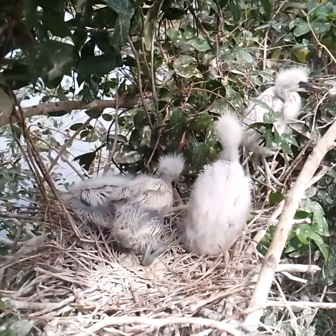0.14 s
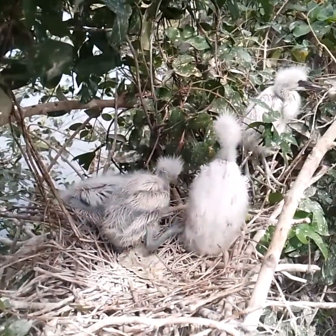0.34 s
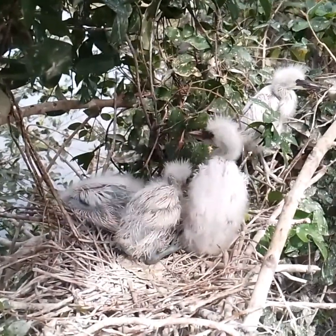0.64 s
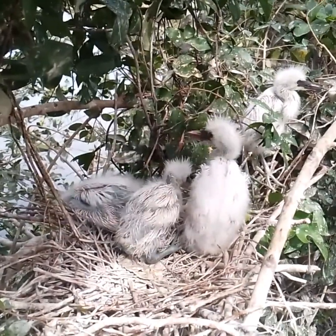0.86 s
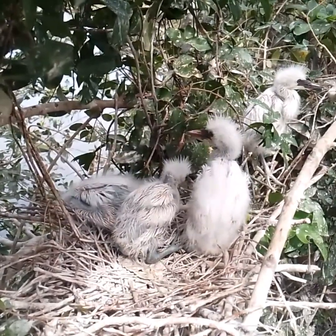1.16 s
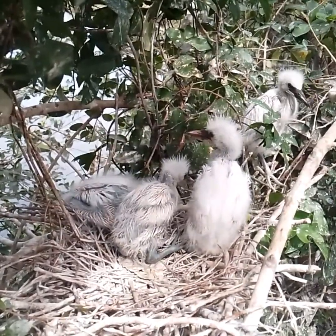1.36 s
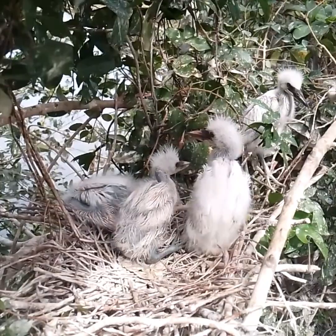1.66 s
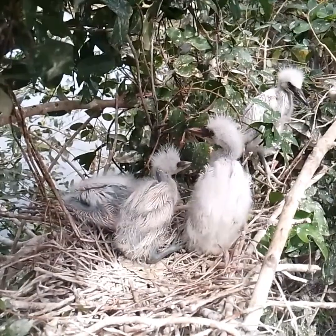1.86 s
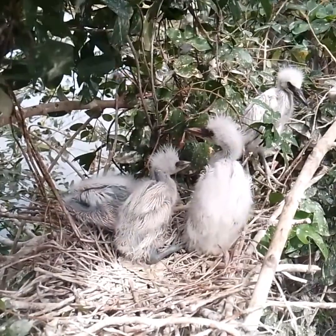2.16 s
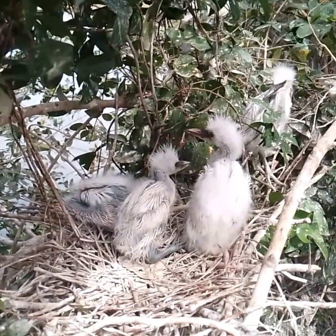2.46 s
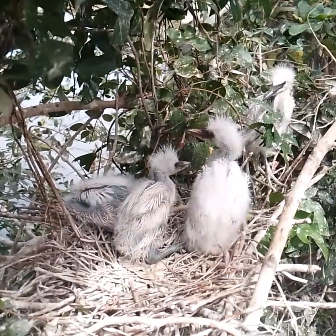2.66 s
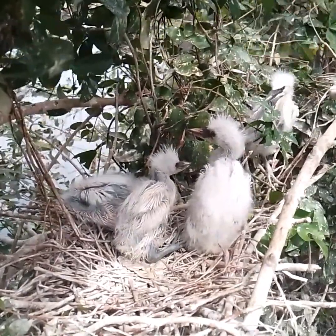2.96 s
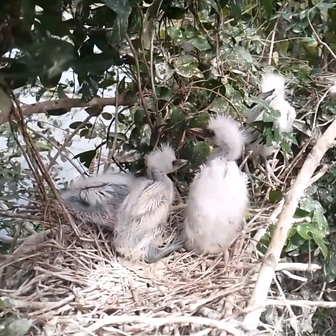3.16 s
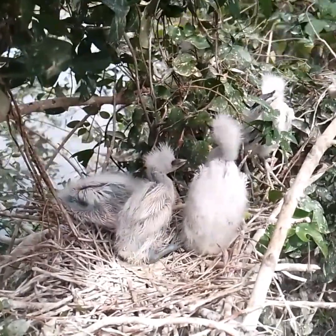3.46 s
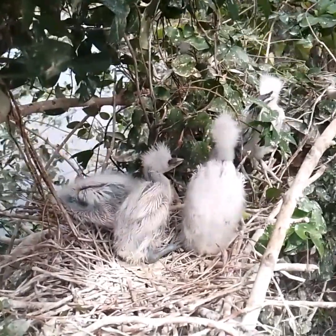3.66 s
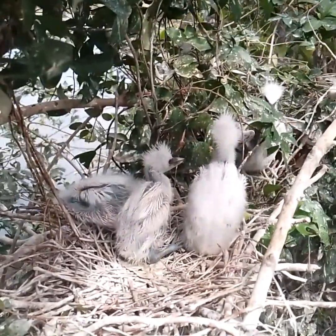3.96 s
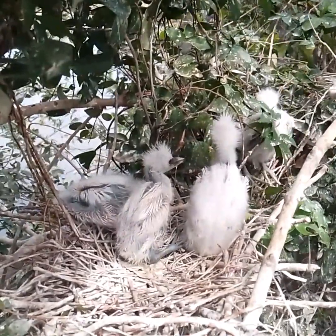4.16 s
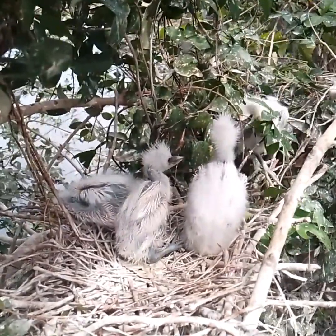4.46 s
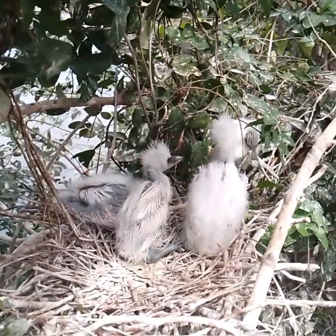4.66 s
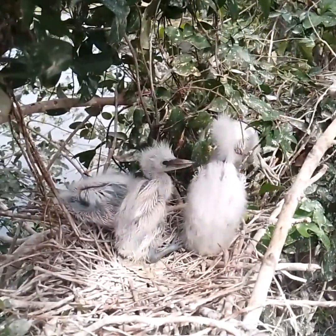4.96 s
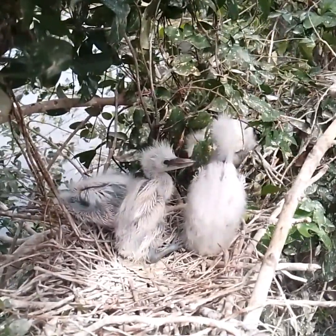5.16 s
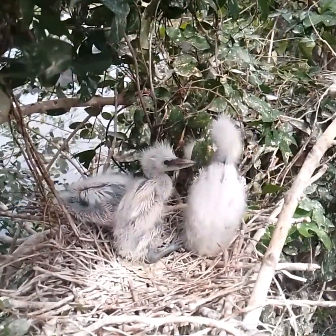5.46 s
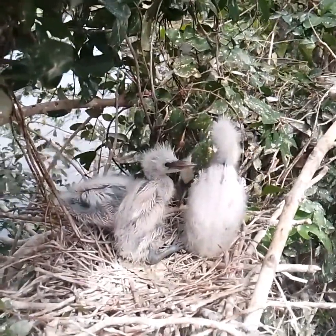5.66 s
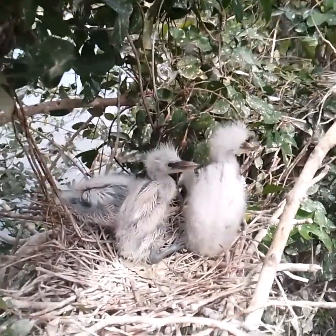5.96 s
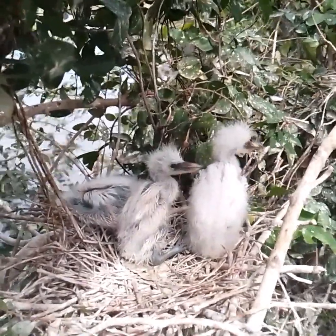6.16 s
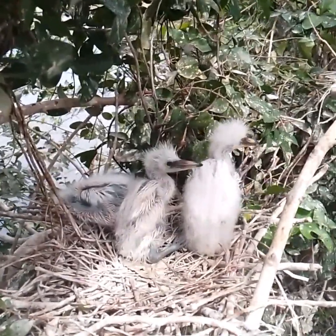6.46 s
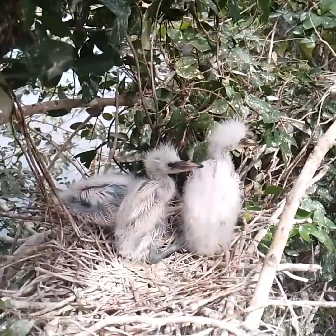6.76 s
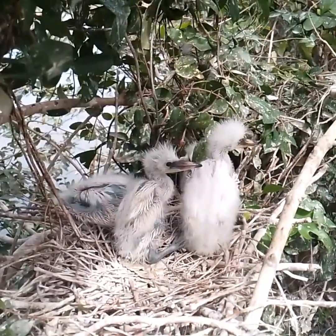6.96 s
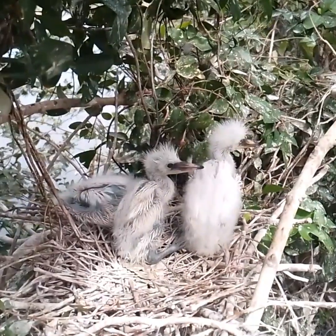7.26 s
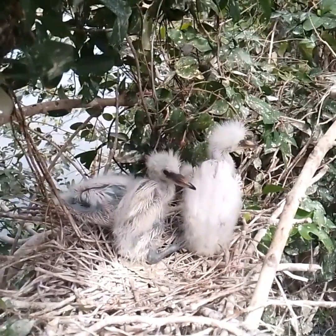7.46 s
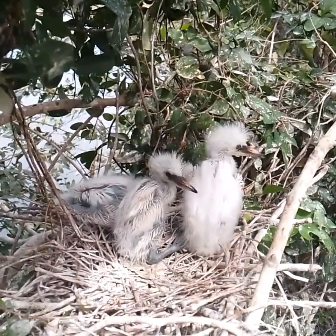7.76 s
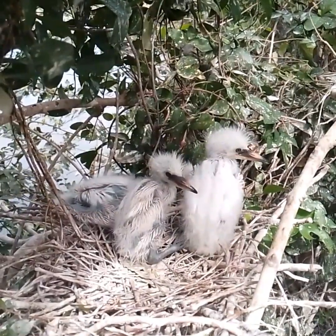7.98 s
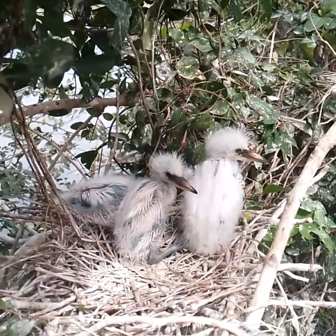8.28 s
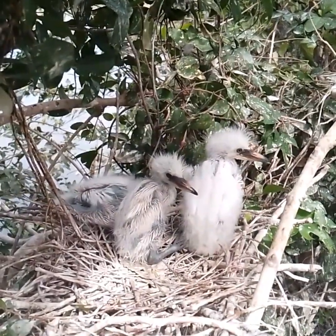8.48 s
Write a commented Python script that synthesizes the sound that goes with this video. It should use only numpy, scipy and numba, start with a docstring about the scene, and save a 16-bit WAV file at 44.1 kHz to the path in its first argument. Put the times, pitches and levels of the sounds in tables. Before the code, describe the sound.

Outdoors in a leafy tree, close to a stick nest of young wading birds, with soft airy background and thin foliage echo. From 0 s dry twigs rustle and low grunts sound; a hissy squawk comes at about 0.6 s and a stronger one at 1.0 s, amid snapping twigs. From 1.4 to 4.5 s it is calmer: faint, short rasping ticks, small grunts, distant thin whines, and rustles near 1.8 and 2.6 s. At 4.8 s a loud, harsh, buzzing squawk bursts out, with a grunt just after, then a higher, hissier one at 5.4 s and rough whines. Ticks quicken around 6.1-6.6 s, with brief harsh squawks at 6.4, 6.7 and 6.9 s and a sharp bill click at 6.96 s. Afterwards come low ticking begging notes, small nasal calls, and brighter crackling shuffles from 8.1 s to the end at about 8.6 s.

```python
"""Egret chicks in a stick nest

Up in a leafy tree, close to a two-port microphone: harsh, hissing squawks buzz through moving throat
resonances, and short begging notes tick as a few rasping cycles. Grunts and whines, buzzes through one
resonance, come from the colony near and far. Twigs and leaves crackle underfoot in showers of tiny grains,
and a bill clicks once, sharply; the trees return a thin echo, and filtered noise makes the outdoor air."""
import sys
import numpy as np
from scipy import signal
from scipy.fft import rfft, irfft, next_fast_len
from scipy.io import wavfile
from scipy.ndimage import uniform_filter1d
from numba import njit

SR = 44100
rng = np.random.default_rng(int(sys.argv[2]) if len(sys.argv) > 2 else 0)


def wav_out(sig):
    """Save sig, one row per channel (or a flat mono array), as 16-bit PCM at SR to the path in sys.argv[1]."""
    wavfile.write(sys.argv[1], SR, np.round(np.clip(np.atleast_2d(sig).T, -1, 1) * 32767).astype(np.int16))


N = 380141   # samples

# Levels in all tables are those at the source, ahead of leaf reflections and microphone ports.
# squawks close by: start_s, attack_s, hold_s, hiss_lag_s, hiss_db, hiss_swell_db_per_s,
# hiss_tilt_db_per_octave, roughness (0-1), nominal_pitch_hz (picks the harmonic that follows the throat),
# chest_db (relative to the lower resonance), left_lead_s, hiss_left_minus_right_db
SQUAWKS = [(0.579, 0.11, 0.04, 0.0011, -39, 17.5, 1.5, 0.4, 471, -19, 0.00007, -1.5),
           (0.988, 0.025, 0.14, 0.0016, -33.5, 30, 2.5, 0.51, 490, -37.5, 0.00012, -0.5),
           (4.809, .015, 0.13, 0.004, -34.5, 51, 0, 0.68, 375, -18, 0.0000075, -4),
           (5.37, 0.1, 0.087, 0.0016, -34, 62, 0, 0.44, 504, -29, 0.0001, 1),
           (6.357, 0.042, 0.0052, 0.001, -40, 20.5, 8, 0.5, 300, -22, 0.00008, 4.5),
           (6.658, 0.023, 0.057, 0.018, -35.5, 89, -0.5, 0.7, 485, -23, 0.00044, -1),
           (6.907, 0.042, 0.04, 0.00069, -29, 1, -1.5, .8, 350, -26, 0.0004, 1.5)]
# how the throat moves, one list per squawk: time_s, lower_hz, lower_db, upper_hz, upper_db
THROATS = [
    [(.65, 1022, -55, 3700, -55), (.74, 898, -61, 3640, -45)],
    [(1.02, 1250, -64, 4100, -45), (1.15, 1006, -55.5, 3310, -40.5)],
    [(4.815, 1673, -36.5, 3780, -34.5), (4.843, 1331, -39, 3120, -35.5), (4.895, 1415, -37.5, 2790, -37.5),
     (4.952, 1544, -35.5, 3140, -35), (4.985, 1576, -31, 3600, -34)],
    [(5.43, 2043, -56, 5950, -43), (5.5, 2326, -49, 6200, -36.5), (5.56, 2202, -55, 6560, -37)],
    [(6.39, 898, -56.5, 4550, -74)],
    [(6.682, 1741, -39, 4300, -34.5), (6.703, 1916, -34.5, 4350, -32), (6.732, 1970, -33, 4470, -36.5),
     (6.748, 1882, -54, 3780, -39)],
    [(6.93, 2307, -43, 4660, -36.5), (6.995, 2047, -35.5, 4870, -51)],
]
# spectrum of the hiss before its tilt: frequency_hz, relative_db
HISS_SPECTRUM = [(2200, -8.5), (3500, -1), (5000, 1), (6200, 2), (8000, 3.5), (9500, -2.5), (11500, -7),
                 (13500, -12), (16000, -19)]
# spectrum of the hard membrane claps: frequency_hz, relative_db
RASP_SPECTRUM = [(650, 12.5), (1250, 23.5), (2300, 14), (7000, 2)]
VOICE_RELEASE_DB_PER_S, HISS_RELEASE_DB_PER_S = 440, 357

# short begging notes: time_s, rasp_peak_db, resonance_hz
TICKS = [(0.45, -52.5, 4900), (1.496, -51.5, 5340), (2.073, -53.5, 7050), (2.205, -58, 5410),
         (2.2998, -52.5, 6360), (2.532, -54.5, 6140), (2.764, -55, 4400), (2.992, -60, 6200),
         (3.2209, -59, 5600), (3.6318, -60.5, 6000), (3.88, -59, 5000), (6.074, -53, 3400),
         (6.17, -56.5, 4530), (6.3, -50, 3440), (6.552, -49.5, 6760), (7.3292, -57.5, 3200),
         (7.6, -55, 3260), (7.859, -62, 4600), (7.939, -51, 3100), (8.079, -61.5, 4400),
         (8.242, -48.5, 3300), (8.532, -48, 3180)]
# spectrum of their breathy rasp: frequency_hz, relative_db
TICK_SPECTRUM = [(1200, -44), (2200, -4), (3500, 1.5), (5500, -6.5), (7500, 6), (9500, -5.5), (15000, -84)]

# grunts, whines and rasps all around: middle_s, length_s, level_db, resonance_hz,
# roughness (limited to 0-1 in the voice), pitch_hz, glide_octaves_per_s, left_lead_ms
COLONY = [(0.172, 0.064, -49, 1180, 0.42, 152, -0.5, -0.31),
          (0.432, 0.1, -47.5, 1158, 0.3, 150.3, -0.5, -0.39),
          (0.607, 0.06, -44, 1160, 0.27, 148.5, 0, -0.34), (0.887, 0.033, -53, 940, 0.2, 190.7, -3, -0.26),
          (1.404, 0.1, -50.5, 3400, .7, 493.5, 1.5, -0.14),
          (1.938, 0.074, -54.5, 3620, 0.7, 526, 0.5, -0.1), (2.617, 0.4, -70, 2280, 0.32, 438, 0.5, 0.32),
          (3.352, 0.4, -72, 2100, 0.5, 418, 0, .4), (3.928, 0.13, -69, 2097, 0.45, 455, -0.5, 0.42),
          (4.109, 0.029, -62.5, 874, 0.88, 291, -1.5, .05),
          (4.374, 0.039, -56.5, 920, 0.85, 310.3, 1.5, 0.057),
          (4.543, 0.093, -54.5, 835, 0.32, 290.3, 2, 0.1), (4.972, 0.046, -35.5, 1130, 0.2, 376.3, 1, 0.04),
          (5.211, 0.11, -58, 3174, 0.4, 553, 0, 0.17), (5.558, 0.048, -43, 1060, 0.5, 538.5, -5.5, 0.13),
          (5.594, 0.13, -43, 1480, 0.65, 485.6, 0.5, -0.65),
          (5.796, 0.15, -58, 1250, 1.2, 320, -0.5, -0.68),
          (5.986, 0.067, -56.5, 1200, 0.4, 255.4, 0.5, .07),
          (6.228, 0.0517, -60.5, 694, 0.7, 327, -1.5, 0.033),
          (6.388, 0.079, -53, 753, 0.47, 386.3, 1.5, 0.095), (6.583, 0.033, -53, 780, 0.37, 397, 4, .09),
          (6.762, 0.083, -44, 997, 0.36, 322, -2, 0.11),
          (6.888, 0.0625, -52.5, 2250, 0.15, 1114, -1, -0.59), (7.722, 0.091, -58, 1510, 1, 403.5, 2, .43),
          (8.011, 0.16, -59, 1370, 0.5, 393, -1, 0.39), (8.063, 0.48, -64.5, 3280, .5, 552, -0.5, -0.32),
          (8.203, 0.082, -49, 1620, 0.3, 276, 2.5, 0.41)]

# a chick shifts its feet and wings: start_s, rise_s, level_db, fade_s (to 1/e), tilt_db_per_octave
SHUFFLES = [(0, 0.005, -50.5, 0.67, 5), (0.15, 0.15, -42.5, 0.13, 7), (0.78, 0.14, -43, 0.12, 4),
            (1.745, 0.084, -47.5, 0.37, 4), (2.55, 0.052, -58.5, 1.7, 1.5), (5.55, 0.12, -47, 0.21, 0),
            (5.94, 0.054, -56, 0.15, -1.5), (6.52, 0.13, -50, 0.098, -2.5), (7.601, 0.11, -52.5, 0.07, -3),
            (8.099, 0.11, -49, 0.254, -1), (8.26, 0.077, -39, 0.067, 1.5), (8.39, 0.036, -39, 0.19, 2)]
# twigs that give way, and at 6.96 s a sharp bill click: start_s, peak_db, fade_s (to 1/e)
SNAPS_AND_CLICK = [(0.822, -43, 0.015), (0.874, -37, 0.045), (0.94, -40.5, 0.0221), (1.759, -43.5, 0.0238),
                   (2.61, -49.5, 0.0375), (4.696, -53, 0.0278), (5.114, -45, 0.0718), (5.352, -48.5, 0.012),
                   (6.96, -20.5, .002), (8.283, -41, .012), (8.299, -38, 0.018), (8.539, -41, 0.0106)]
# the nest platform flexes under a chick's weight: start_s, level_db, fade_s (to 1/e; the rise is a quarter)
THUDS = [(0.899, -63, 0.33), (4.975, -57.5, 0.083)]
# spectrum of crackling leaves before any tilt, also of the bill click: frequency_hz, relative_db
LEAF_SPECTRUM = [(150, -35), (300, -16), (900, -2.5), (1700, -8), (3500, 1), (6000, 3), (8000, 5.5),
                 (11000, 3), (13000, -1.5), (16000, -9)]
REST_DB = -61   # faint rustle of the nest between the moves, before its unevenness
TILT_PIVOT_HZ = 7000

# spectrum of the outdoor air: frequency_hz, relative_db
AIR_SPECTRUM = [(25, -22), (59, 2), (85, -7.5), (125, -10), (160, -21.5), (222, -5), (520, -0.5),
                (1220, -10), (3000, -6.5), (3900, -3.5), (6600, -120)]
AIR_DB, AIR_WANDER_DB = -68.5, 1.2

# resonances of the two microphone ports: centre_hz, width_hz, gain_db
LEFT_PORT = [(7524, 1460, 11.5), (10980, 6230, -10.5)]
RIGHT_PORT = [(10650, 3250, 13), (7100, 7330, -8.5)]
CUTOFF_HZ = 15900


def squawks(lower_width_hz=430, upper_width_hz=620, rasp_db=-1.0, third_ratio=1.37, third_db=-7.5,
            third_width_hz=1300, tail_s=.13, waver=.025, judder_db=1.5):
    """The buzz rings in the chest and three moving throat resonances; the puffs hiss through the open bill."""
    out = np.zeros((2, N))
    for squawk, throat in zip(SQUAWKS, THROATS):
        start, attack, hold, lag, hiss_db, opening, tilt, rough, pitch_hz, chest_db, lead, pan_db = squawk
        t = np.arange(int((attack + hold + tail_s) * SR)) / SR
        lower, lower_db, upper, upper_db = along(throat, start + t)
        effort = swell(t, attack, hold, VOICE_RELEASE_DB_PER_S)
        from_middle = np.minimum(t - attack, hold) - hold / 2
        gape = swell(t - lag, attack, hold, HISS_RELEASE_DB_PER_S)
        gape = gape * from_db(opening * np.maximum(from_middle, -hold / 2))

        bend = 2 ** (waver * drift(len(t), 40))
        lower_hz, upper_hz = lower * bend, upper * bend
        rough = np.clip(rough, 0, 1)
        # the throat pulls the nearest harmonic along with it
        pitch = lower_hz / np.round(lower.mean() / pitch_hz)
        buzz, puffs = syrinx(pitch, rough)
        damping = rough + .5   # a harsh call has a wide open, damped throat

        low = formant(buzz, lower_hz, lower_width_hz * damping)
        chest = evened(high_pass(resonate(buzz, pitch, 105), 270))
        low += from_db(chest_db) * chest
        claps, _ = syrinx(pitch, rough, shimmer_db=6, air=0.51)   # now and then the membranes clap hard
        low += from_db(rasp_db) * rough * coloured(claps, RASP_SPECTRUM)

        high = formant(buzz, upper_hz, upper_width_hz * damping)
        high = high + from_db(third_db) * formant(buzz, third_ratio * upper_hz, third_width_hz)
        tone = effort * (from_db(lower_db) * low + from_db(upper_db) * high)

        breath = puffs * rng.standard_normal((2, len(t)))
        spray = gape * from_db(hiss_db) * coloured(breath, tilted(HISS_SPECTRUM, tilt))
        judder = from_db(judder_db * drift(len(t), 224.6))
        ears = two_ears(tone, lead) + spray * from_db([[pan_db / 2], [-pan_db / 2]])
        add(out, start, among_leaves(judder * ears))
    return out


def syrinx(pitch, rough, jitter=0.22, shimmer_db=2.0, closing=2.04, air=1.0):
    """Membranes slap unevenly and let out a puff of air each cycle: returns the buzz and the puffs' envelope."""
    n = len(pitch)
    turns = np.cumsum(pitch * np.exp(jitter * rough * drift(n, 500))) / SR
    chance = np.clip(rng.standard_normal(n)[turns.astype(int)], -2, 2)   # one draw per cycle
    force = from_db(shimmer_db * rough * chance)
    slaps = rms_one(np.diff(np.floor(turns), prepend=0) * force)
    puffs = rms_one(np.exp(-closing * (turns % 1)) * force)
    return slaps + air * rough * puffs * rng.standard_normal(n), puffs


def ticks(pitch_hz=480, rough=0.64, ring_db=-2.0, width_hz=600, rise_s=0.0095, sharpness=1.08):
    """A begging note is a few rasping cycles, quick to start."""
    out = np.zeros((2, N))
    age = np.arange(int(.07 * SR)) / (rise_s * SR)   # in rise times
    envelope = (age * np.exp(1 - age)) ** abs(sharpness)
    for s, db, hz in TICKS:
        buzz, puffs = syrinx(np.full(len(age), float(pitch_hz)), rough)
        rasp = evened(coloured(puffs * rng.standard_normal(len(age)), TICK_SPECTRUM))
        ring = evened(resonate(buzz, np.full(len(age), float(hz)), width_hz))
        note = from_db(db) * envelope * (rasp + from_db(ring_db) * ring)
        add(out, s - .003, among_leaves(note))
    return out


def colony(width_share=0.079, arch=.16, pitch_db=0.5, waver=0.028, flutter_db=2.0):
    """Each call swells and fades unsteadily, its pitch gliding and arching with the effort, in one resonance."""
    out = np.zeros((2, N))
    for middle, length, db, hz, rough, pitch_hz, glide, lead_ms in COLONY:
        effort = np.sin(np.linspace(0, np.pi, int(1.4 * length * SR)))
        t = (np.arange(len(effort)) - len(effort) / 2) / SR
        bend = (1 + arch * (effort - 1) + waver * drift(len(t), 50)) * 2 ** (glide * t)
        buzz, _ = syrinx(pitch_hz * bend, np.clip(rough, 0, 1), jitter=0.12)
        width = (width_share * hz + 400) * abs(rough) + 250
        call = formant(buzz, hz * bend, width)
        # a weak low band at the fundamental, or at 350 Hz for deeper voices
        low_band = formant(buzz, max(pitch_hz, 350) * bend, width / 2)
        call = call + from_db(pitch_db) * (pitch_hz / hz) ** 2 * low_band
        level = from_db(db + flutter_db * drift(len(t), 89)) * effort ** 2
        add(out, middle + t[0], among_leaves(two_ears(level * call, lead_ms / 10 ** 3)))
    return out


def nest(grains_per_s=400, swish=0.97, uneven_db=3.0, thud_hz=280, thud_width_hz=160):
    """Moves rustle and settle; twigs slip in bursts of crackle, a bill clicks; the platform creaks dully."""
    out = from_db(REST_DB) * crackle(N, grains_per_s, swish)
    for s, rise, db, fade, tilt in SHUFFLES:
        age = np.arange(int((rise + 4 * fade) * SR))[:N] / SR
        rustle = swell(age, rise, 0, 20 / np.log(10) / fade) * crackle(len(age), grains_per_s, swish, tilt)
        add(out, s, among_leaves(from_db(db) * rustle, scatter_db=-7.0))
    out *= from_db(uneven_db * drift(N, 30))
    for s, db, fade in SNAPS_AND_CLICK:   # the bill click is the same kind of burst, but very short
        age = np.arange(int(4 * fade * SR)) / SR
        burst = evened(crackle(len(age), per_s=2600, smooth=1.0))
        add(out, s, among_leaves(from_db(db) * np.exp(-age / fade) * burst))
    for s, db, fade in THUDS:
        age = np.arange(int(4 * fade * SR)) / SR
        flex = resonate(rng.standard_normal(len(age)), np.full(len(age), float(thud_hz)), thud_width_hz)
        add(out, s, from_db(db) * swell(age, fade / 4, 0, 20 / np.log(10) / fade) * rms_one(flex))
    return out


def crackle(n, per_s, smooth, tilt=0):
    """Grains of noise of all sizes, as of tiny fractures in dry leaves and bark, over a steady swish."""
    grains = (rng.random(n) < per_s / SR) * rng.exponential(1, n)
    # each grain dies away over 5.6 ms
    scatter = rms_one(signal.lfilter([1], [1, -np.exp(-1 / (0.0056 * SR))], grains + 1e-18))
    return coloured((scatter + smooth) * rng.standard_normal((2, n)), tilted(LEAF_SPECTRUM, tilt))


def among_leaves(x, t60=.06, scatter_db=4.0, lowest_hz=2300):
    """Every perch has its own pattern of reflections from the nearest leaves."""
    out = echoes(x, t60, scatter_db, lowest_hz)
    out[:, :x.shape[-1]] += x
    return out


def echoes(x, t60, db, lowest_hz):
    """Dense scatter off foliage, different at each ear; long waves pass the leaves by."""
    age = np.arange(int(t60 * SR)) / SR
    tail = high_pass(rng.standard_normal((2, len(age))) * from_db(-60 * age / t60), lowest_hz)
    tail *= from_db(db) / np.sqrt(np.sum(tail ** 2, axis=1, keepdims=True))
    return signal.fftconvolve(np.atleast_2d(x), tail, axes=1)


def outdoor_air(side_db=-5.5):
    """Slowly wandering noise, a shared middle and a weaker part of opposite sign at the two ears."""
    mid, side = coloured(rng.standard_normal((2, N)), AIR_SPECTRUM)
    level = from_db(AIR_DB + AIR_WANDER_DB * drift(N, 3.95))
    return level * (mid + from_db(side_db) * side * [[1], [-1]])


def two_ears(x, lead_s):
    """A sound from one side reaches the left ear earlier or later than the right."""
    t = np.arange(len(x)) / SR
    return np.array([x, np.interp(t - lead_s, t, x)])


@njit
def resonate(x, hz, width):
    """A two-pole resonance whose centre moves, its bandwidth set in Hz."""
    y, r = np.zeros(len(x)), np.exp(-np.pi * width / SR)
    for i in range(2, len(x)):
        drive = (1 - r * r) / 2 * (x[i] - x[i - 2])
        y[i] = drive + 2 * r * np.cos(2 * np.pi * hz[i] / SR) * y[i - 1] - r * r * y[i - 2]
    return y


def formant(x, hz, width):
    """A moving resonance with steep skirts, at an even level."""
    return evened(resonate(resonate(x, hz, width), hz, width))


def evened(x, window_s=0.0121):
    """Hold the level at 1 and keep the fast flutter."""
    return x / np.sqrt(np.abs(uniform_filter1d(x * x, int(window_s * SR))) + 1e-12)


def swell(age, attack, hold, release_db_per_s):
    """A smooth rise, a hold and a steady dying away."""
    rise = np.sin(np.pi / 2 * np.clip(age / attack, 0, 1)) ** 2
    return rise * from_db(-release_db_per_s * np.maximum(age - attack - hold, 0))


def drift(n, rate):
    """Random values of spread about 1, drawn rate times a second and joined by straight lines."""
    knots = np.arange(n) * rate / SR
    return np.interp(knots, np.arange(n // 8 + 2), rng.standard_normal(n // 8 + 2))


def coloured(x, spectrum):
    """Give x a spectrum, rolled off beyond both ends; rms 1."""
    hz, db = np.transpose(spectrum)
    n = next_fast_len(x.shape[-1])
    f = np.fft.rfftfreq(n, 1 / SR) + 1   # keeps the logarithm finite
    gain = from_db(np.interp(np.log(f), np.log(hz), db))
    gain = gain * np.minimum(f / hz[0], 1) ** 2 * np.minimum(hz[-1] / f, 1)
    return rms_one(irfft(rfft(x, n) * gain, n)[..., :x.shape[-1]])


def tilted(spectrum, db_per_octave):
    """The same spectrum, brighter or duller."""
    return [(hz, db + db_per_octave * np.log2(hz / TILT_PIVOT_HZ)) for hz, db in spectrum]


def high_pass(x, hz):
    """Thin out the lows at 12 dB per octave."""
    return signal.sosfilt(signal.butter(2, hz, "high", fs=SR, output="sos"), x)


def from_db(db):
    """Decibels to amplitude."""
    return 10 ** (np.asarray(db) / 20)


def rms_one(x):
    """Scale to an rms of 1."""
    return x / np.sqrt(np.mean(x ** 2) + 1e-20)


def along(rows, t):
    """The columns of a curve at times t."""
    s, *columns = np.transpose(rows)
    return [np.interp(t, s, c) for c in columns]


def add(out, s, x):
    """Mix x in from time s on."""
    i = max(int(s * SR), 0)
    out[:, i:i + x.shape[-1]] += x[..., :N - i]


def scene():
    """Birds and nest, the thin echo of the trees around, and the outdoor air."""
    dry = squawks() + ticks() + colony() + nest()
    trees = echoes(dry, t60=0.42, db=-12.0, lowest_hz=2770)[:, :N]
    return dry + trees + outdoor_air()


def port(x, resonances):
    """Peaks and dips of one microphone port."""
    for hz, width, db in resonances:
        w, a = 2 * np.pi * hz / SR, from_db(db / 2)
        damp = np.sin(w) * width / hz / 2
        zeros = [1 + damp * a, -2 * np.cos(w), 1 - damp * a]
        poles = [1 + damp / a, -2 * np.cos(w), 1 - damp / a]
        x = signal.lfilter(zeros, poles, x)
    return x


def record(dry):
    """Each microphone port rings at its own pitch; a steep low-pass cuts the top."""
    heard = np.array([port(dry[0], LEFT_PORT), port(dry[1], RIGHT_PORT)])
    return signal.sosfilt(signal.ellip(12, .1, 80, CUTOFF_HZ, fs=SR, output="sos"), heard)


dry = scene()
out = record(dry)
wav_out(out)
```